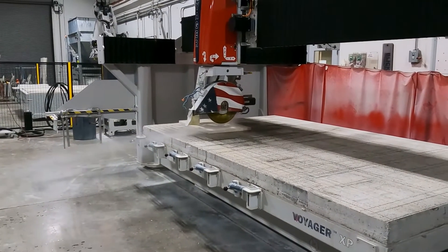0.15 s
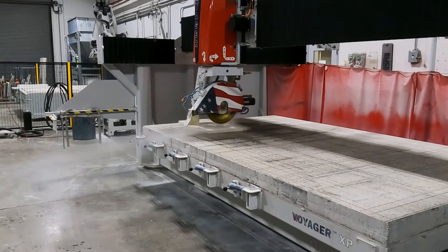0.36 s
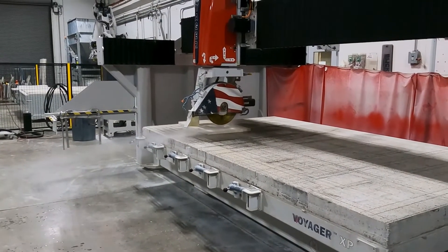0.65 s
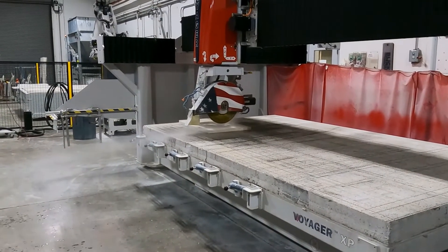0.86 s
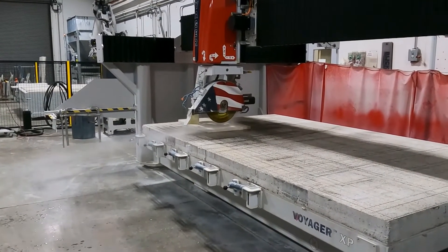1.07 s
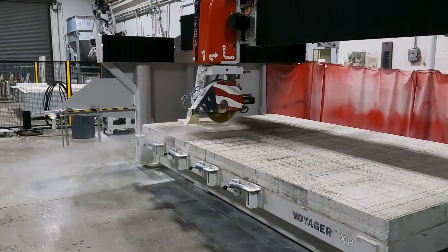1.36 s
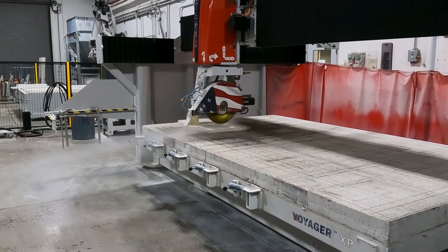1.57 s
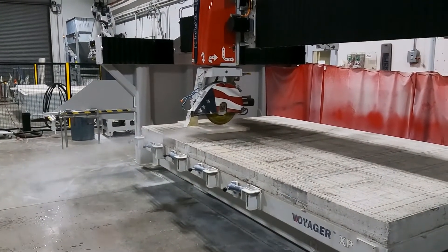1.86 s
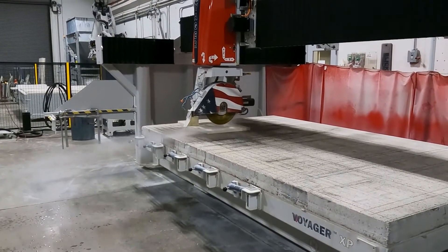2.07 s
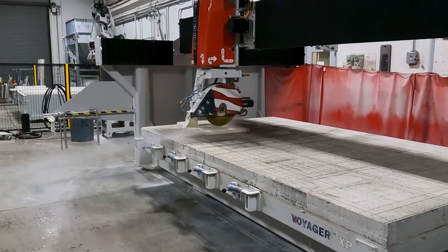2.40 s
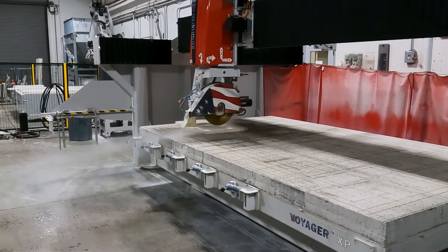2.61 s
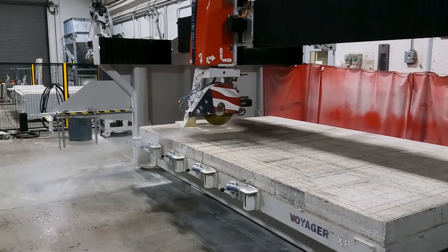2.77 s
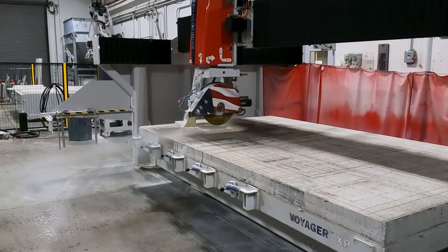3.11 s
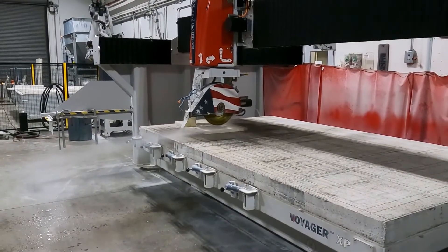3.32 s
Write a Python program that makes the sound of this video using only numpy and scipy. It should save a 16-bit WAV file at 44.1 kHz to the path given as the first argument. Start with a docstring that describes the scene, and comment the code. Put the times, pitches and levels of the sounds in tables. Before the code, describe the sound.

Steady high whine and water hiss of a large stone saw above a low workshop rumble.

```python
"""A large wet stone saw runs at constant speed in a workshop hall, its head creeping along the table.
The spindle motor whines in pure tones that swell and shift between the ears as the head travels.
Water hisses off the blade, the disc rings under it, and a coarser wash fades early on.
A hollow band of noise near 850 Hz swells unevenly, and the frame drones very low. Behind the saw
the hall rumbles, with one short hollow whoop at the start and soft thuds throughout."""
import sys
import numpy as np
from scipy import signal
from scipy.fft import rfft, irfft, next_fast_len
from scipy.io import wavfile
from scipy.ndimage import uniform_filter1d, map_coordinates

SR = 44100
rng = np.random.default_rng(int(sys.argv[2]) if len(sys.argv) > 2 else 0)


def store_pcm(level_fs):
    """Save levels as 16-bit WAV."""
    pcm = np.round(np.clip(level_fs, -1, 1) * 32767).astype(np.int16)
    wavfile.write(sys.argv[1], SR, np.atleast_2d(pcm).T)


N = 152145
TIME = np.arange(N) / SR


def amp(db):
    """Decibels to gain."""
    return 10 ** (np.asarray(db) / 20)


def unit(x):
    """Normalise to rms 1."""
    return x / np.sqrt(np.mean(x ** 2) + 1e-20)


def along(points, hz):
    """Read a curve of (frequency [Hz], value) points on a log frequency axis."""
    freqs, values = np.transpose(points)
    return np.interp(np.log(hz + 1), np.log(freqs + 1), values)


def envelopes(rows):
    """One breakpoint envelope for each column after the time."""
    times, *columns = np.transpose(rows)
    return [np.interp(TIME, times, column) for column in columns]


def wobble(rate):
    """Smooth random modulation, rate knots a second."""
    return map_coordinates(rng.standard_normal(int(N * rate / SR) + 4), [TIME * rate])


def filtered(x, response):
    """Filter x with a complex frequency response."""
    size = next_fast_len(N + SR // 2)
    return irfft(rfft(x, size) * response(np.fft.rfftfreq(size, 1 / SR)), size)[..., :N]


def sides(difference):
    """Split a left-minus-right difference between the channels."""
    return np.array([[.5], [-.5]]) * difference


# How much later the noise reaches the left ear: (frequency [Hz], delay [ms])
LEFT_DELAY = [(500, 0), (900, 0.034), (3800, 0.051), (5000, 0.021), (8000, 0.0048)]

def noise_bed(eq, correlation, patchy_db, size=512):
    """Patchy stereo noise of rms 1; correlation lists (frequency [Hz], left-right likeness [0-1])."""
    spectrum = signal.stft(rng.standard_normal((2, N)), nperseg=size)[2]
    patches = uniform_filter1d(rng.standard_normal(spectrum.shape[1:]), size=4, axis=0)
    patches = uniform_filter1d(patches, size=8, axis=1)
    pair = signal.istft(spectrum * amp(patchy_db * unit(patches)), nperseg=size)[1][:, :N]
    width = lambda hz: np.arccos(np.clip(along(correlation, hz), -1, 1)) / 2
    mid, side = filtered(pair, lambda hz: amp(along(eq, hz)) * [np.cos(width(hz)), np.sin(width(hz))])
    delay = lambda hz: np.exp(-2j * np.pi * hz * sides(along(LEFT_DELAY, hz) / 1000))
    return unit(filtered(np.array([mid + side, mid - side]), delay))


SHAFT_HZ, LEFT_LAG_MS = 41.667, 0.036  # the saw stands a little to the right

def shaft_tone(order, wander_rad, start_cycles):
    """A stereo sine of rms 1 locked to the shaft, its phase stirred by the hall."""
    t = TIME - sides(LEFT_LAG_MS / 1000)
    drift = wander_rad * (wobble(12) + .5 * np.array([wobble(11), wobble(9.4)]))
    return np.sqrt(2) * np.sin(2 * np.pi * (order * SHAFT_HZ * t + start_cycles) + drift)


# Lead tones of the motor, low to high: (pitch [multiple of the shaft rate])
LEAD_ORDERS = [87, 93, 99, 105]
# Their swell and pan as the head travels: (time [s], level [dB], left minus right [dB])
LEAD_87 = [(0, -36, -1.8), (0.35, -39, -20), (0.8, -38.5, 1), (1.3, -46, 0), (2.9, -51, -2),
           (3.45, -64, -3.1)]
LEAD_93 = [(0, -32.5, 16), (0.2, -30.5, 20), (0.7, -24.5, 4), (1.1, -24.5, -2), (1.8, -23, -4),
           (2.4, -22.5, -1), (2.7, -26, -1.56), (3, -30.5, -9), (3.45, -30.5, -3)]
LEAD_99 = [(0, -21, 0), (0.25, -24.5, -4.5), (0.9, -25, -9), (1.3, -20, -2), (1.75, -18.5, -1),
           (2.1, -20.5, -2), (2.45, -23, -2.5), (2.78, -26, -4), (3.05, -24.5, -0.1), (3.45, -28.5, -5)]
LEAD_105 = [(0, -38, -10), (0.6, -34.5, -6), (1.301, -39, -15), (1.9, -37, -16), (2.5, -36.5, -6),
            (3.45, -38, -18)]
# Faint comb of spindle tones: (pitch [multiple of the shaft rate]) and, to match, (level [dB])
COMB_ORDERS = [75, 83, 92, 95, 96, 97, 100, 109, 145, 166, 170, 172, 174, 176, 182, 184, 188, 198, 208]
COMB_LEVELS = [-48, -49, -48, -44, -48, -46, -47, -44, -53, -50, -48, -50, -45, -44, -52, -52, -52, -47,
               -49]

def motor_whine():
    """Four strong motor tones beat in step, six times a turn, amid a comb of faint ones."""
    out = np.zeros((2, N))
    for order, rows in zip(LEAD_ORDERS, [LEAD_87, LEAD_93, LEAD_99, LEAD_105]):
        level_db, pan_db = envelopes(rows)
        gain = amp(level_db + sides(pan_db) + 0.55 * wobble(16))
        out += gain * shaft_tone(order, wander_rad=0.025, start_cycles=0.14 * rng.standard_normal())
    for order, level_db in zip(COMB_ORDERS, COMB_LEVELS):
        gain = amp(level_db + sides(-1) + 2 * wobble(4.06))
        out += gain * shaft_tone(order, wander_rad=0.5, start_cycles=rng.random())
    return out


# Bright spray, ringing disc and coarse wash: (frequency [Hz], relative level [dB])
SPRAY_EQ = [(1500, -59), (2900, -25), (3100, -5), (3750, -6), (3900, -1), (4600, 3), (5200, -2), (6300, -1),
            (7300, -2.5), (7850, -4), (7980, -5.5), (10000, -7), (12200, -11), (14000, -22)]
DISC_EQ = [(3000, -26), (3750, -18), (3900, 8.5), (4200, 8.5), (4400, -8), (4750, 4), (5300, -46.5)]
WASH_EQ = [(600, -13.5), (1200, -12), (1800, -4.5), (1980, 0.5), (2250, 2), (2400, -3.5), (2550, 4),
           (2850, -3.5), (3150, 0), (3600, 3.5), (4500, -2), (7000, -42)]
# Stereo image of the spray: (frequency [Hz], left-right likeness [0-1])
SPRAY_IMAGE = [(3000, 0.95), (5000, 0.87), (7000, 1), (9000, 1), (12000, 0.77)]
# Fade of the wash, before its trim: (time [s], level [dB])
WASH_FADE = [(0, -34.5), (0.3, -37.5), (0.5, -36.5), (0.8, -41.5), (1.3, -46.5), (2.3, -49), (2.75, -54.5),
             (3, -49.5), (3.45, -53)]
SPRAY_DB, SPRAY_FADE_DB_PER_S, DISC_DB, WASH_TRIM_DB = -27.1, 0.2, -33.5, 6

def wet_blade():
    """Fine spray hisses off the blade, the disc rings under it, and a coarser wash dies away."""
    spray_gain = amp(SPRAY_DB - SPRAY_FADE_DB_PER_S * TIME + sides(-0.4))
    spray = spray_gain * noise_bed(SPRAY_EQ, SPRAY_IMAGE, patchy_db=1.0)
    disc = amp(DISC_DB + sides(-1.2)) * noise_bed(DISC_EQ, [(4000, 0.21)], patchy_db=1.0)
    wash_db, = envelopes(WASH_FADE)
    wash = noise_bed(WASH_EQ, [(1400, 0.89), (2500, 0.86)], patchy_db=2.5, size=1024)
    return spray + disc + amp(wash_db + WASH_TRIM_DB) * wash


# Swells of the hollow band, before its trim: (time [s], level [dB])
HOLLOW_SWELLS = [(0, -36.5), (.2, -44), (.5, -44), (.67, -49), (.85, -46.5), (1.5, -43.5), (2.1, -54),
                 (2.35, -45.5), (2.75, -49), (3, -54), (3.23, -36), (3.45, -46)]
# Its midrange colour: (frequency [Hz], relative level [dB])
HOLLOW_EQ = [(620, -34), (720, -5.5), (770, 0), (930, 3), (985, 1), (1150, -1.5), (1300, -37)]
HOLLOW_TRIM_DB = -1.5

def hollow_band():
    """A hollow band of noise near 850 Hz swells unevenly."""
    level_db, = envelopes(HOLLOW_SWELLS)
    return amp(level_db + HOLLOW_TRIM_DB) * noise_bed(HOLLOW_EQ, [(850, 0.78)], patchy_db=4.0)


# Sub-bass throb of the frame: (time [s], level [dB])
FRAME_THROB = [(0, -16.5), (.06, -14.5), (.2, -11.5), (.24, -18), (.28, -10.5), (.41, -12.5), (.46, -19.5),
               (.51, -14), (.56, -17), (.62, -8.5), (.7, -15.5), (.73, -11.5), (.81, -16), (.85, -10),
               (1.03, -15.5), (1.08, -12.5), (1.58, -13.5), (1.63, -21), (1.81, -12), (1.93, -19),
               (2.07, -9.5), (2.22, -18.5), (2.31, -10.5), (2.48, -14), (2.58, -10.5), (2.8, -20),
               (2.85, -12.5), (3.12, -17.5), (3.2, -14), (3.45, -16)]
DRONE_HZ, DRONE_WANDER_HZ, DRONE_FLUTTER_DB = 29.4, 0.83, 1

def frame_drone():
    """The heavy frame drones on one wavering, very low note."""
    level_db, = envelopes(FRAME_THROB)
    phase = 2 * np.pi * np.cumsum(DRONE_HZ + DRONE_WANDER_HZ * wobble(11)) / SR
    gain = amp(level_db + DRONE_FLUTTER_DB * wobble(17) + sides(0.6 + 0.8 * wobble(4.7)))
    return gain * np.sqrt(2) * np.sin(phase + sides(0.04 * wobble(11)))


# Low end and dull room tone of the hall: (frequency [Hz], relative level [dB])
RUMBLE_EQ = [(25, -22), (45, 12), (65, 5), (90, -4.5), (120, 2), (160, -9), (220, -11.5), (300, -23),
             (600, -42)]
ROOM_EQ = [(100, -26), (230, 3), (290, -1.5), (380, -1.5), (550, -.5), (720, -2), (1100, -4.5), (1450, -5),
           (2000, -13.5), (4000, -59)]
RUMBLE_DB, ROOM_DB, ROOM_SWELL_DB = -37.5, -41, 1.5

def hall():
    """The workshop rumbles under a dull, uneven room tone."""
    rumble = amp(RUMBLE_DB + 2.4 * wobble(20)) * noise_bed(RUMBLE_EQ, [(100, 1.0)], patchy_db=3.5)
    room = noise_bed(ROOM_EQ, [(200, 1.0), (500, 0.79)], patchy_db=5.0, size=768)
    return rumble + amp(ROOM_DB + ROOM_SWELL_DB * wobble(16) + sides(-0.27)) * room


# Glide of the hollow note: (time [s], centre pitch [Hz], level [dB])
WHOOP_GLIDE = [(.05, 740, -46), (.09, 800, -31), (.13, 888, -27), (.21, 850, -41), (.32, 835, -35),
               (.55, 850.3, -41)]
WHOOP_WIDTH_HZ, WHOOP_RELEASE_DB_PER_S = 160, 150

def whoop():
    """One hollow note of narrow noise rises, sinks, lingers faintly and dies."""
    hz, level_db = envelopes(WHOOP_GLIDE)
    release_db = WHOOP_RELEASE_DB_PER_S * np.maximum(TIME - WHOOP_GLIDE[-1][0], 0)
    grain = wobble(WHOOP_WIDTH_HZ) + 1j * wobble(WHOOP_WIDTH_HZ)
    phase = 2 * np.pi * np.cumsum(hz) / SR - sides(0.7)
    return amp(level_db - release_db) * unit(np.real(grain * np.exp(1j * phase)))


# Soft hits in the rumble: (time [s], level [dB], half-width [s], centre pitch [Hz])
THUD_CUES = [(.165, -34, 0.011, 210), (.26, -39, 0.024, 260), (.34, -35.5, 0.017, 120),
             (.49, -38.5, 0.031, 510), (.85, -34, 0.012, 135), (.99, -33.5, 0.0091, 110),
             (1.17, -29.5, 0.023, 100), (1.43, -39.5, 0.019, 190), (1.51, -35, 0.02, 165),
             (1.73, -34.5, 0.023, 115), (1.995, -36.5, 0.021, 80), (2.19, -40, .02, 250),
             (2.32, -42.5, 0.086, 430), (2.64, -29, 0.019, 85), (2.83, -40, 0.034, 170),
             (3.02, -39.5, 0.0087, 370), (3.094, -32, 0.0096, 220), (3.235, -31, 0.021, 115),
             (3.38, -32.5, .02, 140)]
THUD_SCATTER = 0.29  # how far the pitch strays, as a share of its centre

def thuds():
    """Soft dull thuds, each a short swell of unsteady cycles around its own pitch."""
    out = np.zeros(N)
    for peak_s, level_db, half_width, hz in THUD_CUES:
        phase = 2 * np.pi * np.cumsum(hz * (1 + THUD_SCATTER * wobble(90))) / SR
        swell = np.exp(-((TIME - peak_s) / (2 * half_width)) ** 2)
        out += amp(level_db) * swell * np.sqrt(2) * np.sin(phase)
    return out


def scene():
    """The mix of saw and hall."""
    return motor_whine() + wet_blade() + hollow_band() + frame_drone() + hall() + whoop() + thuds()


# High cut on the whole mix: (frequency [Hz], gain [dB])
HIGH_CUT = [(12150, 0), (12280, -10), (14000, -18), (15000, -28)]
TOP_HZ = 15000

def record(dry):
    """The top of the hiss rolls off, with nothing left above the band limit."""
    return filtered(dry, lambda hz: amp(along(HIGH_CUT, hz)) * (hz < TOP_HZ))


dry = scene()
out = record(dry)
store_pcm(out)
```